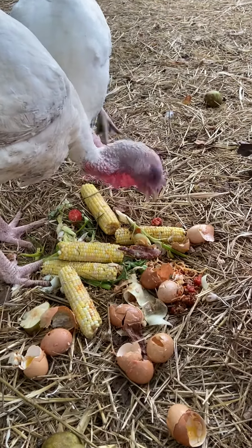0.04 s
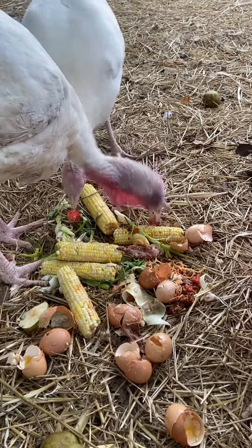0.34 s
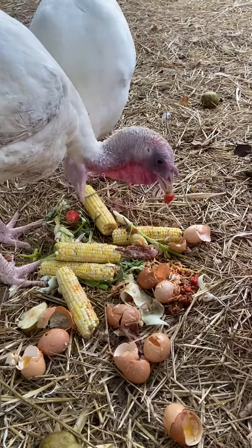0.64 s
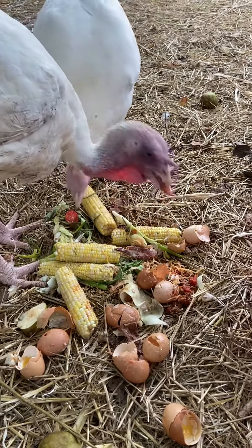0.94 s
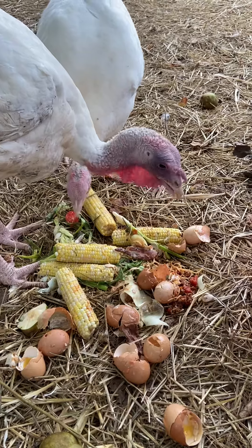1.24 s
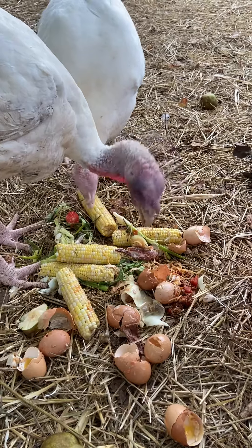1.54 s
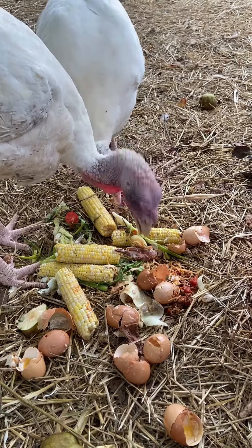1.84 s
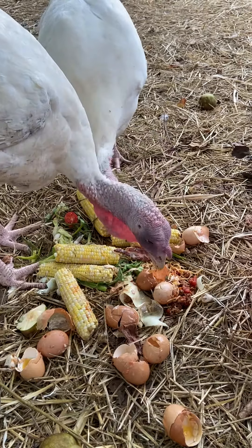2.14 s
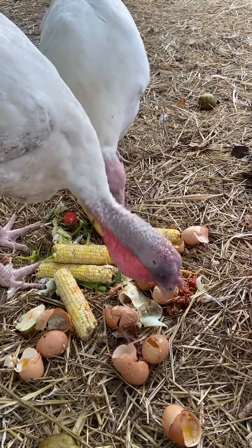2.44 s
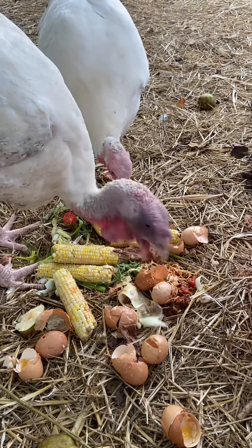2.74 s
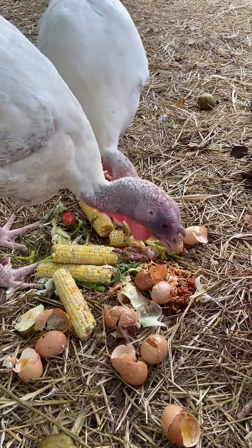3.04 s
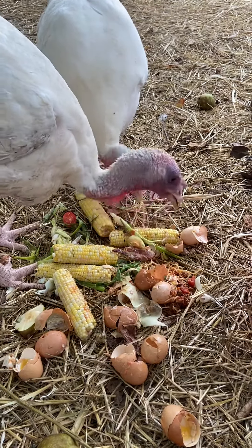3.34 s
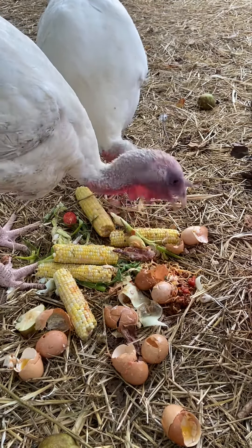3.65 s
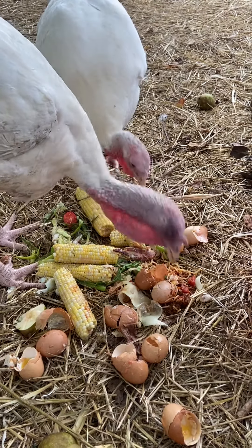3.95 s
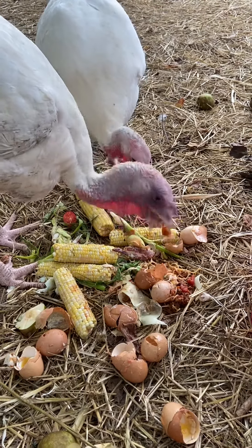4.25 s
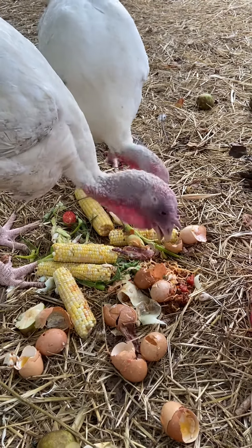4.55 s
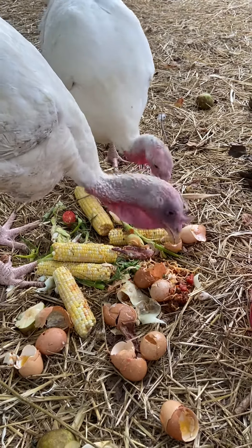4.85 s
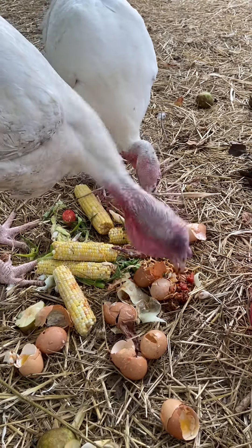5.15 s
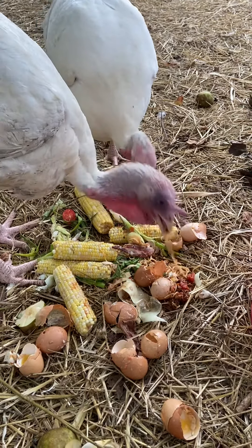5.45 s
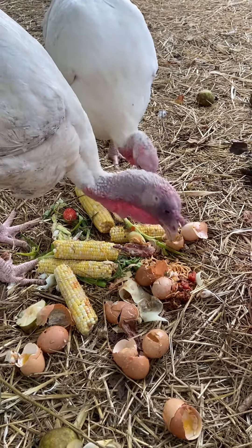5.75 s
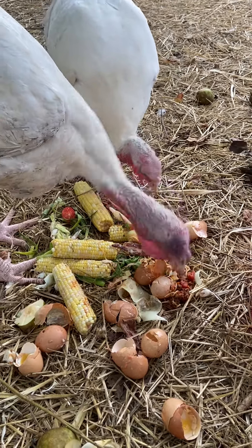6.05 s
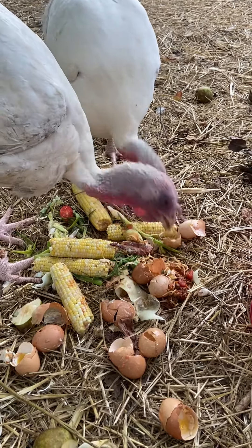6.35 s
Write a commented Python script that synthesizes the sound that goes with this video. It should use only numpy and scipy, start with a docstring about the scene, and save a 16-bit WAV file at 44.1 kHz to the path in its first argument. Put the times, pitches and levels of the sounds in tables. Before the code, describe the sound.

Turkeys peck at scraps and eggshells on straw close to the microphone, over a low rumble of light wind that swells a little near the end. Small ticks, scrapes and faint straw crackle run throughout. A dull bump on the ground comes at 0.5 seconds, and at about 0.7 seconds one bird gives a short yelp, a whistle breaking into a hoarse lower note with a slight echo. Soft mutters and light pecks follow until about 2 seconds. A sharp peck lands at 2.5 seconds and another at 3.6, then a thud and a very soft cluck at 3.8. Firmer pecks cluster between 4.2 and 4.8 seconds, with more around 5.5 and from 6.2 to 6.6, and a low bump near 5.7. Faint crickets pulse in the background, a small bird peeps a few times, and a distant fowl hoots softly around 2.5 and 6 seconds.

```python
"""Two turkeys peck at vegetable scraps and eggshells on straw, a step away from a hand-held phone.
Beaks knock and scrape, stalks snap, feet shuffle and bump. Both birds mutter as they feed; one gives
a short yelp that breaks down an octave, and later comes a soft cluck. Behind them crickets pulse
their wings, a small bird peeps, a fowl hoots far off and light wind rumbles on the microphone."""
import sys
import numpy as np
from scipy import signal
from scipy.fft import rfft, irfft, next_fast_len
from scipy.io import wavfile
from scipy.ndimage import uniform_filter1d

SR = 44100
rng = np.random.default_rng(int(sys.argv[2]) if len(sys.argv) > 2 else 0)


def int16_out(signal):
    """Quantize to a 16-bit WAV file."""
    q = np.round(np.clip(np.atleast_2d(signal).T, -1, 1) * 32767)
    wavfile.write(sys.argv[1], SR, q.astype(np.int16))


N = 294567
TIME = np.arange(N) / SR
HIT = TIME[:4096]  # time axis of one short sound
LEAD_S = .01  # run-up before the instant of contact
TOP_HZ = 15900


def undb(db):
    """Decibels to gain."""
    return 10 ** (np.asarray(db) / 20)


def unit(x):
    """Scale to rms 1."""
    return x / np.sqrt(np.mean(x ** 2))


def noise():
    """Three unrelated white noises."""
    return rng.standard_normal((3, N))


def walk(per_s):
    """Smooth random drift with rms 1."""
    hold = int(SR / per_s)
    steps = np.repeat(rng.standard_normal(N // hold + 1), hold)[:N]
    return unit(uniform_filter1d(steps, hold))


def curve(rows, column=1):
    """One column of a table, joined by straight lines in time."""
    rows = np.array(rows)
    return np.interp(TIME, rows[:, 0], rows[:, column])


def phase_of(hz):
    """Running phase of a moving pitch."""
    return 2 * np.pi * np.cumsum(hz) / SR


def swell(start_s, hold_s, rise_s, fall_s):
    """Envelope that reaches 1 at the start, holds and dies away."""
    before, after = np.maximum(start_s - TIME, 0), np.maximum(TIME - start_s - hold_s, 0)
    return np.exp(-before / rise_s - after / fall_s)


def phrases(rows, rise_s, fall_s):
    """Two envelopes from rows of (start [s], hold [s], level [dB], level [dB])."""
    gains = np.zeros((2, N))
    for start, hold, *db in rows:
        gains = np.maximum(gains, undb(db)[:, None] * swell(start, hold, rise_s, fall_s))
    return gains


def colour(x, points):
    """Minimum-phase EQ through (frequency [Hz], gain [dB]) points, rolling off below the first."""
    hz, db = np.transpose(points)
    n = next_fast_len(x.shape[-1] // 2 + 1, True) * 2
    grid = np.maximum(np.fft.rfftfreq(n, 1 / SR), 1)
    gain_db = np.interp(np.log(grid), np.log(hz), db) - 20 * np.maximum(np.log2(hz[0] / grid), 0)
    cepstrum = irfft(np.log(undb(gain_db)))
    cepstrum[1:n // 2] *= 2
    cepstrum[n // 2 + 1:] = 0
    return irfft(rfft(x, n) * np.exp(rfft(cepstrum)))[..., :x.shape[-1]]


def resonate(x, hz, width_hz):
    """One resonance, gain 1 at its centre."""
    return signal.lfilter(*signal.iirpeak(min(hz, TOP_HZ), hz / min(width_hz, SR / 4), fs=SR), x)


def band(x, hz, width_hz):
    """The same resonance twice, for steeper skirts."""
    return resonate(resonate(x, hz, width_hz), hz, width_hz)


def spread(three, correlation):
    """Stereo from one shared and two separate signals; -1 or less puts the sides in antiphase."""
    c = np.clip(correlation, -1, 1)
    return np.sqrt(abs(c)) * three[0] * np.array([[1], [np.sign(c)]]) + np.sqrt(1 - abs(c)) * three[1:]


def ports(x, phase_points):
    """A near sound reaches the two microphone ports with a phase gap that depends on frequency."""
    n = next_fast_len(N, True)
    turn = np.interp(np.fft.rfftfreq(n, 1 / SR), *np.transpose(phase_points))
    return irfft(rfft(x, n) * np.exp(.5j * np.array([turn, -turn])), n)[:, :N]


def yard(x, t60):
    """Diffuse reverb of the yard, different left and right."""
    t = TIME[:SR // 2]
    tail = rng.standard_normal((2, len(t))) * undb(-60 * t / t60) * (t > .012)
    return signal.fftconvolve(x[None], tail / np.sqrt(np.sum(tail ** 2) / 2))[:, :N]


def add(track, s, sound, db):
    """Mix a short sound in at time s, its loudest 2 ms at the given level."""
    start = max(int(s * SR), 0)
    loudest = np.sqrt(uniform_filter1d(sound ** 2, size=88).max())
    track[start:start + len(sound)] += (sound * undb(db) / loudest)[:N - start]


def grains(per_s, scatter_db):
    """Three unrelated streams of clicks of uneven size."""
    return unit(noise() * (rng.random((3, N)) < per_s / SR) * undb(scatter_db * noise()))


def contact(length_s, tail_db, rise_s, tail_s, grit=0.97):
    """A burst of tiny fractures that builds as the tip presses in, then a faint settling."""
    fractures = rng.standard_normal(len(HIT)) * np.exp(grit * rng.standard_normal(len(HIT)))
    after, before = np.maximum(HIT - LEAD_S, 0), np.maximum(LEAD_S - HIT, 0)
    decay = np.exp(-(after / length_s) ** 2) + undb(tail_db) * np.exp(-after / tail_s)
    return fractures * np.exp(-before / rise_s) * decay


def squeaks(rows, sweep_per_s, waver, rasp, flutter_hz):
    """Short raspy notes that swell and fade on a gliding, unsteady pitch."""
    out = np.zeros(N)
    t = HIT - HIT[-1] / 2
    for s, half_s, hz, db in rows:
        wobble = unit(resonate(rng.standard_normal(len(t)), flutter_hz, flutter_hz))
        shake = unit(resonate(rng.standard_normal(len(t)), flutter_hz, flutter_hz))
        tone = np.sin(phase_of(hz * (1 + sweep_per_s * t + waver * wobble)))
        add(out, s + t[0], tone * (1 + rasp * shake) * np.exp(-(t / half_s) ** 2), db)
    return out


# The breeze at the microphone: (time [s], level [dB])
BREEZE = [(0, -48.5), (1.5, -48.5), (2.9, -50.5), (4.8, -51.5), (5.4, -48.5), (6.68, -48)]
# Gusts riding on it: (peak time [s], half length [s], boost [dB])
GUSTS = [(1.022, 0.1, 2), (1.774, 0.12, 4), (5.76, 0.19, 5.5), (6.242, 0.062, 6), (6.644, 0.059, 5)]
# EQ of the buffeting: (frequency [Hz], gain [dB])
RUMBLE_EQ = [(13, -40.5), (22, -23.5), (49, 3), (87, 3.5), (169, -8.5), (227, -17.5), (260, -24.5),
             (420, -39), (550, -67.5), (920, -120)]
# EQ of the open-air hiss: (frequency [Hz], gain [dB])
AIR_EQ = [(130, 14.5), (220, 10), (400, 3.5), (700, -2.5), (1050, -1), (1600, -6.5), (2500, -22.5),
          (4400, -9), (6000, -3.5), (9500, -33.5), (15500, -9.5)]
def wind(air_db=-69.5, deep_db=-2):
    """Low buffeting that both ports share, over the faint hiss of open air."""
    level_db = curve(BREEZE) + sum(db * np.exp(-((TIME - s) / half_s) ** 2) for s, half_s, db in GUSTS)
    rumble = unit(colour(spread(noise(), 0.993), RUMBLE_EQ))
    # stronger gusts shed bigger eddies, so the deepest part swells most
    deep = signal.sosfiltfilt(signal.butter(2, 55, fs=SR, output="sos"), rumble)
    rumble = rumble + deep * (undb(deep_db + level_db - level_db.mean()) - 1)
    air = unit(colour(spread(noise(), 0.025), AIR_EQ))
    return rumble * undb(level_db) + air * undb(air_db + .5 * walk(1.0))


def wings(hz, width_hz, correlation, stroke_hz, depth, waver_db=1.2):
    """Wing strokes of many insects pulse one resonance; their strength wavers."""
    strokes = 1 + depth * np.sin(phase_of(stroke_hz * (1 + 0.05 * walk(0.91))))
    strokes *= undb(waver_db * walk(16))
    return unit(band(spread(noise(), correlation) * strokes, hz, width_hz))


# Cricket trills: (start [s], hold [s], high singer level [dB], low singer level [dB])
TRILLS = [(0.1, 0.42, -72, -71.5), (0.66, 0.29, -71, -72.5), (1.38, 0.48, -71.5, -71.5),
          (1.9, 0.35, -70.5, -74.5), (2.78, 0.34, -73, -70.5), (3.26, 0.46, -72.5, -74),
          (3.8, 0.34, -71.5, -71.5), (4.6, 0.32, -70.5, -73.5), (5.1, 0.39, -71, -71.5),
          (5.88, 0.78, -73.5, -73.5), (6.56, 0.14, -69, -68.5)]
# Hiss bands of the insect bed: (centre [Hz], width [Hz], level [dB], stereo correlation)
CHORUS = [(6625, 330, -66, -0.91), (7380, 510, -64, -.99), (8250, 260, -69.5, -0.955),
          (13400, 1800, -80, -1.3)]
def insects(low_trim_db=-2):
    """Two kinds of cricket trill in phrases, each a band with a sharp core, over a steady chorus."""
    high_gain, low_gain = phrases(TRILLS, rise_s=0.11, fall_s=0.052)
    high = wings(5147, 810, correlation=0.37, stroke_hz=61, depth=0.13)
    high += undb(-4) * wings(5337, 57, correlation=0.068, stroke_hz=42, depth=0.13)
    low = wings(3940, 1700, correlation=0.047, stroke_hz=68, depth=0.26)
    low += undb(-5) * wings(3740, 140, correlation=0.0058, stroke_hz=50, depth=0.19)
    out = high * high_gain + low * low_gain * undb(low_trim_db)
    for hz, width, db, correlation in CHORUS:
        hiss = wings(hz, width, correlation, stroke_hz=76, depth=.15)
        out += undb(db) * unit(resonate(hiss, hz, 2 * width))
    return out


# Peeps of a small bird: (centre time [s], half length [s], pitch [Hz], level [dB])
CHIRPS = [(1.32, 0.0027, 4420, -62.5), (5.635, 0.0091, 3900, -67.5), (5.675, 0.0075, 3990, -62),
          (5.882, 0.004, 3980, -61)]
def chirps():
    """A distant bird gives tiny, rough peeps."""
    return squeaks(CHIRPS, sweep_per_s=1.64, waver=0.026, rasp=0.75, flutter_hz=300)


# Hoots of the far fowl: (start [s], end [s], start pitch [Hz], end pitch [Hz], level [dB])
HOOTS = [(2.256, 2.315, 565, 578, -72.5), (2.322, 2.51, 464, 455.6, -68), (2.623, 2.647, 482, 490, -68),
         (2.78, 2.847, 455, 463, -73), (6.046, 6.092, 586, 534, -71), (6.34, 6.596, 369.6, 361, -79.5)]
def far_fowl(trim_db=4, waver=.024, octave_db=-12, rasp_db=-4):
    """Soft, slightly hoarse hoots carry across the farm, washed in yard reverb."""
    out = np.zeros(N)
    for start, end, start_hz, end_hz, db in HOOTS:
        phase = phase_of(np.interp(TIME, [start, end], [start_hz, end_hz]) * (1 + waver * walk(60)))
        tone = np.sqrt(2) * (np.sin(phase) + undb(octave_db) * np.sin(2 * phase))
        arch = np.sin(np.pi * np.clip((TIME - start) / (end - start), 0, 1))
        envelope = undb(db + trim_db + 2 * walk(70)) * np.sqrt(np.abs(arch))
        out += envelope * tone * (1 + undb(rasp_db) * walk(160))
    return undb(-3) * out + undb(-5) * yard(out, t60=0.4)


# Feet shifting in the straw: (start [s], hold [s], crackle level [dB], crunch level [dB])
SHUFFLES = [(0.095, 0.036, -72.5, -78), (0.24, 0.26, -73, -74), (0.92, 0.19, -77, -80),
            (1.72, 0.56, -100, -78), (2.3, 0.075, -81.5, -92), (2.53, 0.04, -70, -75),
            (2.7, 0.19, -104, -80), (3.5, 0.087, -77.5, -98), (3.82, 0.24, -93, -76.5),
            (4.22, 0.2, -80, -78), (4.6, 0.083, -67, -74), (4.75, 0.046, -76, -70), (5.05, 0.25, -81, -105),
            (5.87, 0.23, -94, -76), (6.3, 0.065, -78, -82.5), (6.6, 0.1, -102, -77)]
# EQ of the soft crunch: (frequency [Hz], gain [dB])
CRUNCH_EQ = [(300, -12.5), (600, 5.5), (1100, 10.5), (1700, 0.5), (2500, 0), (5000, -19)]
def straw(crackle_trim_db=5, crunch_trim_db=1, flicker_db=3):
    """Feet bend stalks in small clumps: fine crackle on top, a sparser, duller crunch underneath."""
    crackle_eq = [(1500, 5.4), (2500, 2.9), (4000, 7.1), (6000, 5.4), (10000, 9.4), (15500, 0.58)]
    crackle = unit(colour(spread(grains(per_s=1400, scatter_db=1), 0.42), crackle_eq))
    coarse = grains(per_s=500, scatter_db=3) + 1.26 * noise()
    crunch = unit(colour(spread(coarse, -0.19), CRUNCH_EQ))
    crackle_gain, crunch_gain = phrases(SHUFFLES, rise_s=0.039, fall_s=0.025)
    # a floor under each envelope: the straw never lies quite still beneath the birds
    crackle *= np.hypot(crackle_gain, undb(-81)) * undb(crackle_trim_db + flicker_db * walk(45))
    crunch *= np.hypot(crunch_gain, undb(-83.5)) * undb(crunch_trim_db + flicker_db * walk(25))
    return crackle + crunch


# Dull thuds on the ground: (time [s], level [dB], pitch [Hz])
BUMPS = [(0.498, -35.5, 148), (3.76, -39, 137), (5.626, -60, 102), (5.739, -43, 108), (6.238, -50, 110)]
def bumps(trim_db=-3, swell_s=0.002):
    """The soft ground answers feet and beaks with a few low cycles."""
    out = np.zeros(N)
    for s, db, hz in BUMPS:
        add(out, s, np.sin(2 * np.pi * hz * HIT) * HIT * np.exp(-HIT / swell_s), db + trim_db)
    return out


# Stalks and shell breaking: (time [s], crack level [dB], tick level [dB], tick pitch [Hz])
SNAPS = [(0.0657, -53, -53, 9400), (0.2442, -57.5, -55, 12700), (0.271, -66, -59, 13100),
         (0.334, -62, -59, 12500), (0.377, -58, -51, 11000), (0.643, -71, -55, 10400),
         (.77, -52, -53.5, 10400), (.784, -60, -51.5, 11700), (0.9869, -49, -70, 7400),
         (1.0994, -74, -55.5, 11200), (1.2236, -55.5, -50.5, 11800), (1.3603, -74, -60, 9800),
         (2.1948, -49.5, -48, 12600), (2.542, -59, -59, 10500), (2.5575, -59, -68, 9000),
         (2.57, -59, -58.5, 11000), (3.3348, -63, -55, 9500), (3.4002, -56, -72, 7900),
         (3.54, -65, -56, 13000), (3.6035, -53, -41, 11800), (3.944, -60, -53.5, 8600),
         (4.1047, -56.5, -61.5, 9400), (4.364, -70, -61, 10000), (4.383, -54, -72, 7500),
         (4.6706, -58, -53, 10500), (4.881, -79, -58, 8950), (5.1426, -57.5, -52.5, 13900),
         (5.2645, -61, -55, 10000), (5.612, -62, -59, 10500), (6.0188, -72, -55, 11400),
         (6.092, -59, -58, 10700), (6.19, -58, -52, 13000), (6.542, -47, -58, 8000),
         (6.635, -76, -53.5, 9800)]
def snaps(crack_trim_db=-1):
    """Dry stalks and bits of shell break at once: a bright tick, a crack and a few torn fibres."""
    out = np.zeros(N)
    for s, crack_db, tick_db, tick_hz in SNAPS:
        fibres = contact(.0008, tail_db=-30, rise_s=.0003, tail_s=.01)
        fracture = fibres / np.linalg.norm(fibres) + signal.unit_impulse(len(HIT), int(LEAD_S * SR))
        add(out, s - LEAD_S, band(fracture, tick_hz, width_hz=0.6 * tick_hz), tick_db)
        add(out, s - LEAD_S, band(fracture, hz=4800, width_hz=4000), crack_db + crack_trim_db)
    return out


# Feeding murmurs: (centre time [s], half length [s], pitch [Hz], level [dB])
MURMURS = [(.133, 0.0097, 1380, -58.5), (.186, 0.011, 1110, -57.5), (1.526, 0.018, 1140, -60.5),
           (1.553, .012, 900, -68), (1.59, 0.01, 730, -58.5), (1.705, 0.0097, 1080, -71),
           (1.774, 0.013, 1140, -59), (1.798, 0.011, 1080, -63), (1.942, 0.019, 1050, -65),
           (2.145, 0.017, 1060, -75), (3.785, 0.011, 419, -61.5), (4.92, 0.0065, 512, -75),
           (5.05, 0.0075, 507, -75), (5.908, 0.01, 568, -59), (6.25, 0.016, 504, -64)]
def murmurs():
    """The turkeys mutter through closed beaks as they feed."""
    return squeaks(MURMURS, sweep_per_s=-0.99, waver=0.069, rasp=.45, flutter_hz=108)


# EQ of the nearly closed throat: (frequency [Hz], gain [dB])
CLUCK_EQ = [(200, 2), (420, 3.5), (620, -7), (860, -3), (1100, 7), (1450, -12), (1800, 10), (2300, -21),
            (5000, -50)]
def cluck(pitch_hz=217, jitter=0.0224, level_db=-62):
    """One soft cluck just before a peck: a few slow pulses through a nearly closed throat."""
    pulses = (1 + np.cos(phase_of(pitch_hz * (1 + jitter * walk(150))))) ** 90
    voice = unit(colour(unit(pulses - pulses.mean()), CLUCK_EQ))
    return voice * undb(level_db) * swell(3.754, hold_s=.021, rise_s=0.0075, fall_s=0.0048)


# Formants of the yelping throat: (centre [Hz], width [Hz], gain [dB])
FORMANTS = [(705, 170, 14), (1160, 160, 12), (1810, 34, 3), (2320, 85, 9), (2850, 170, 5.5), (3300, 60, 8),
            (3900, 89, 8), (4950, 480, -2), (5650, 490, 3)]
def hoarse_voice(flap_phase, rasp=4.9):
    """Uneven flapping chops the air stream and rings the throat."""
    pulses = (1 + np.cos(flap_phase)) ** 8
    source = unit(pulses - pulses.mean()) + rasp * unit(pulses * rng.standard_normal(N))
    throat = sum(undb(db) * resonate(source, hz, width) for hz, width, db in FORMANTS)
    voice_eq = [(400, -7), (620, 3), (1100, 2), (4200, 1), (6000, -10), (7000, -12), (15000, -5)]
    return unit(colour(throat, voice_eq))


# Pitch line of the yelp: (time [s], whistle pitch [Hz], hoarse pitch [Hz])
YELP_PITCH = [(.675, 1340, 660), (.695, 1325, 650), (.709, 1290, 585), (.722, 1260, 615), (.74, 1215, 690),
              (.76, 1320, 700), (.82, 1300, 650)]
# Overtones of the whistle: (harmonic number, gain [dB])
OVERTONES = [(2, -11), (3, -6.5)]
def yelp(break_s=.7085, whistle_db=-52, hoarse_db=-41, undertone_db=-47, leak_db=-8, jitter=0.048):
    """A whistle turns rough and breaks into a hoarse voice about an octave below."""
    # the effort peaks just before the break
    push_db = 11 * np.exp(-((TIME - break_s + 0.00062) / 0.004) ** 2)
    whistle_gain = undb(whistle_db + push_db) * swell(0.6765, hold_s=0.044, rise_s=0.0022, fall_s=0.013)
    hoarse_gain = undb(hoarse_db) * swell(break_s, hold_s=0.032, rise_s=0.0014, fall_s=0.033)
    flutter = unit(resonate(rng.standard_normal(N), hz=96, width_hz=180))
    # the whistle loses its overtones and starts to shake as the voice breaks
    clean = whistle_gain / (whistle_gain + hoarse_gain + 1e-18)
    phase = phase_of(curve(YELP_PITCH) * (1 + (.014 + .025 * (1 - clean)) * flutter))
    shake = 1 + .5 * (1 - clean) * walk(220)
    overtones = sum(undb(db) * np.sin(k * phase) for k, db in OVERTONES)
    whistle = whistle_gain * (np.sin(phase) + clean * overtones)
    # after the break a low note joins in and rises
    flap_phase = phase_of(curve(YELP_PITCH, column=2) * (1 + jitter * flutter))
    undertone_gain = undb(undertone_db) * swell(.712, hold_s=.031, rise_s=.003, fall_s=0.013)
    tones = np.sqrt(2) * shake * (whistle + undertone_gain * np.sin(flap_phase))
    # air rasps through the throat even while the whistle holds
    hoarse = hoarse_voice(flap_phase) * (hoarse_gain + undb(leak_db) * whistle_gain)
    return (TIME < YELP_PITCH[-1][0]) * (tones + hoarse) + 1e-18


# Slapback off the pen walls: (delay [s], gain [dB])
WALL_ECHOES = [(0.074, -3), (0.096, -10), (.168, -21)]
def yelp_in_pen(lean=0.4305, reverb_db=-17):
    """The walls throw the yelp back dulled, and the yard adds a short tail."""
    voice = yelp()
    dull = resonate(voice, 1415, 250) + undb(-20) * resonate(voice, 500, 650)
    echoed = voice + sum(undb(db) * np.roll(dull, int(s * SR)) for s, db in WALL_ECHOES)
    # the whistle band is louder at the left port
    panned = echoed + np.array([[lean], [-lean]]) * resonate(echoed, 1070, 1260)
    left_lead = [(0, -2.9), (700, 3.1), (1300, 5.0), (2000, -1.3), (4000, -1.8), (5000, -2.0)]
    return ports(panned, left_lead) + undb(reverb_db) * yard(voice, t60=0.29)


# Beak drags through food and straw: (centre time [s], level [dB], half length [s], centre [Hz])
SCRAPES = [(.02, -62.5, 0.1, 1140), (0.133, -60.5, 0.051, 1340), (0.962, -65, 0.023, 1260),
           (1.143, -65, 0.052, 1150), (1.389, -62.5, 0.02, 915), (1.552, -61.5, 0.023, 990),
           (1.618, -68.5, 0.046, 935), (1.7, -66.5, 0.043, 1030), (1.816, -62.5, 0.019, 1050),
           (1.893, -64, 0.032, 805), (1.936, -77, 0.014, 1050), (2.046, -65, 0.031, 1000),
           (2.155, -65, 0.13, 1020), (2.568, -68, 0.018, 1110), (3.214, -65, 0.023, 1840),
           (3.425, -68, 0.0064, 925), (3.803, -66, 0.018, 970), (3.877, -73, 0.018, 960),
           (3.954, -64, 0.029, 1120), (4.618, -69, 0.016, 1770), (4.767, -55, 0.02, 960),
           (4.805, -65.5, 0.031, 970), (5.281, -64, 0.016, 1320), (5.465, -58, 0.016, 1030),
           (5.645, -63.5, 0.016, 1650), (5.837, -66.5, 0.019, 1030), (5.906, -63.5, 0.016, 736),
           (6.086, -84, 0.016, 635), (6.21, -57, 0.0043, 1300), (6.275, -68, 0.024, 920),
           (6.4, -57, 0.015, 980), (6.583, -56.5, 0.0057, 1020), (6.67, -67.5, 0.022, 990)]
def scrapes(trim_db=3, slips_per_s=900, scatter_db=6, cavity_db=3, fibre_db=-14):
    """The tip catches and slips: wet food and the open beak answer low, tearing fibres higher."""
    out = np.zeros(N)
    middle_s = HIT[-1] / 2
    for s, db, half_s, hz in SCRAPES:
        slipping = rng.random(len(HIT)) < slips_per_s / SR
        size, sign = rng.standard_normal((2, len(HIT)))
        envelope = np.exp(-((HIT - middle_s) / half_s) ** 2)
        slips = slipping * np.sign(sign) * undb(scatter_db * size) * envelope
        food = band(slips, hz, width_hz=1.4 * hz)
        cavity = undb(cavity_db) * resonate(food, hz, width_hz=260)
        fibres = undb(fibre_db) * band(slips, hz=2240, width_hz=2200)
        add(out, s - middle_s, food + cavity + fibres, db + trim_db)
    return out


# Beak blows: (time [s], knock level [dB], knock pitch [Hz], hollow level [dB], hollow pitch [Hz],
# crack level [dB], splinter level [dB], contact length [s], ring stretch [x])
PECKS = [(0.165, -62.5, 1980, -66, 1210, -74, -64, 0.0039, .4),
         (0.9674, -58.5, 1250, -75, 850, -57.5, -55, 0.0083, .7),
         (1.092, -79, 880, -58, 544, -68, -75, 0.0029, .6),
         (1.357, -90, 1090, -51.5, 727, -83, -60, 0.0072, 1.5),
         (1.568, -77, 1330, -76, 800, -51, -60, 0.0078, .6),
         (1.582, -65, 960, -59, 720, -55, -62, 0.0036, .5),
         (2.4863, -52, 1150, -75, 800, -64, -66, .001, .7),
         (2.499, -39.5, 1077, -44, 664, -38, -43, 0.0027, .7),
         (2.5043, -57, 1110, -50, 614, -36, -51, 0.00092, .45),
         (2.624, -63, 1700, -69, 1000, -67, -78, .0015, .45),
         (2.7196, -61.5, 1120, -75, 780, -54, -55.5, 0.011, 1),
         (2.762, -62, 1280, -68, 1020, -64, -81, 0.0031, .8),
         (2.8747, -56, 1130, -84, 900, -77, -81, 0.0067, 1),
         (3.6027, -43, 1150, -49, 815, -40.5, -41.5, 0.0025, .45),
         (3.781, -43, 1170, -80, 855, -52.5, -57, 0.0023, .9),
         (3.9796, -55, 1320, -67, 900, -52.5, -63, 0.0036, .8),
         (4.147, -58.5, 1140, -88, 820, -80, -73, 0.0023, .8),
         (4.2346, -47, 1206, -93, 910, -49, -57, 0.0056, .6),
         (4.3955, -41, 1162, -44.5, 816, -50, -56, 0.0098, 1.1),
         (4.5663, -47.5, 970, -47, 716, -49.5, -59, 0.0041, .25),
         (4.5747, -54, 1110, -73, 800, -68, -75, .0015, .4),
         (5.2554, -70, 1800, -73, 900, -57, -68, 0.0025, .4),
         (5.2603, -64, 1900, -67, 900, -58, -54, 0.0023, .3),
         (5.27, -63, 1050, -61, 690, -55, -56, 0.0068, .5),
         (4.7496, -53, 1100, -58, 690, -57.5, -64, 0.0063, .8),
         (5.453, -51.5, 954, -54.5, 790, -60, -62, 0.004, .8),
         (5.459, -59.5, 1790, -58, 805, -60, -58, 0.0067, .8),
         (5.502, -56, 1030, -73, 670, -75, -71, 0.0024, 1),
         (5.727, -62, 1320, -75, 800, -68, -84, .002, .4),
         (6.2177, -52, 970, -66, 560, -54, -42.5, 0.0017, .35),
         (6.2256, -51, 1240, -67, 830, -52, -70, 0.0011, .4),
         (6.3895, -55, 920, -61, 684, -54, -62, 0.011, .8),
         (6.563, -50.5, 910, -73, 770, -64, -66, 0.0019, .6),
         (6.574, -54.5, 980, -64, 780, -54, -60, 0.0083, 1)]
# Modes of beak and food: (multiple of the knock pitch [x], gain [dB], t60 before stretch [s])
KNOCK_MODES = [(1, 22, 0.041), (1.17, -1, 0.16), (1.6, -7, 0.019)]
# EQ of the midrange crack: (frequency [Hz], gain [dB])
CRACK_EQ = [(1200, -11.5), (1950, 5), (2500, -3), (3100, 7.5), (4200, -0.5), (6000, 4), (8000, -16),
            (11000, -26)]
# EQ of the bright splinters: (frequency [Hz], gain [dB])
SPLINTER_EQ = [(3000, 6.5), (6500, 6), (9000, 8), (11500, 2.5), (13500, -8.5), (16000, 6)]
def pecks(knock_trim_db=-1.5, hollow_trim_db=-1.7, crack_trim_db=-1, crumble=0.38, hollow_t60=0.032):
    """Each blow rings beak and food, and cracks what lies under the tip."""
    out = np.zeros(N)
    for s, knock_db, knock_hz, hollow_db, hollow_hz, crack_db, splinter_db, contact_s, stretch in PECKS:
        knock = sum(np.sin(2 * np.pi * knock_hz * ratio * HIT) * undb(db - 60 * HIT / (t60 * stretch))
                    for ratio, db, t60 in KNOCK_MODES)
        hollow = np.sin(2 * np.pi * hollow_hz * HIT) * undb(-60 * HIT / (hollow_t60 * stretch))
        # one firm push, with the food crumbling around it
        crumbs = contact(contact_s, tail_db=-27, rise_s=.0007, tail_s=.02)
        push = signal.unit_impulse(len(HIT), int(LEAD_S * SR)) / 2
        push += crumble * crumbs / np.linalg.norm(crumbs)
        # so small a body radiates little bass
        push = colour(push, [(350, -25), (700, -1.5), (3000, -6.5), (8000, 2)])
        start = s - LEAD_S
        add(out, start, signal.fftconvolve(push, knock)[:len(HIT)], knock_db + knock_trim_db)
        add(out, start, signal.fftconvolve(push, hollow)[:len(HIT)], hollow_db + hollow_trim_db)
        fracture = contact(contact_s, tail_db=-28, rise_s=contact_s / 5, tail_s=.02)
        add(out, start, colour(fracture, CRACK_EQ), crack_db + crack_trim_db)
        add(out, start, colour(fracture, SPLINTER_EQ), splinter_db)
    return out


# Stereo image of the feeding spot: (frequency [Hz], phase lead of the left port [rad])
FEEDING_PHASE = [(0, 1), (1000, 1.63), (1500, 1.5), (2100, -0.14), (2700, 3.5), (3500, 1.5), (5000, 1.31),
                 (6000, 0.5), (7000, -6), (8000, -10), (9700, 8), (10800, 6.5), (13400, 7.5),
                 (14500, -13.5), (16000, 20)]
def scene():
    """The feeding birds in front, the farm around them."""
    feeding = ports(pecks() + scrapes() + snaps() + murmurs(), FEEDING_PHASE)
    turkeys = feeding + bumps() + straw() + yelp_in_pen() + cluck()
    return turkeys + far_fowl() + chirps() + insects() + wind()


def record(dry):
    """The phone cuts the top with a steep low-pass."""
    return signal.sosfilt(signal.ellip(10, .2, 80, TOP_HZ, fs=SR, output="sos"), dry)


dry = scene()
out = record(dry)
int16_out(out)
```